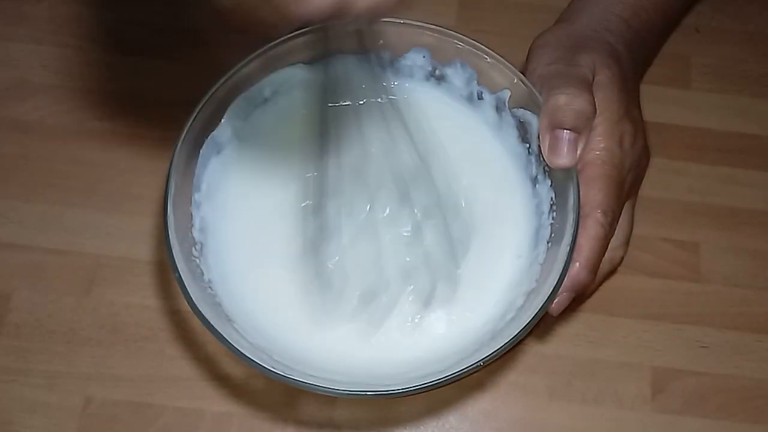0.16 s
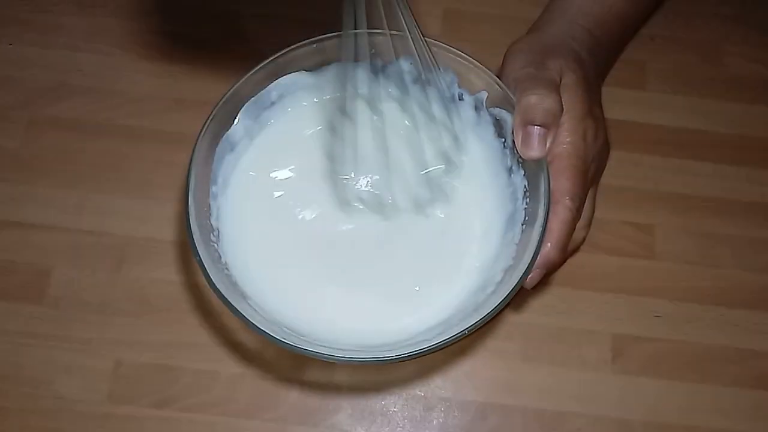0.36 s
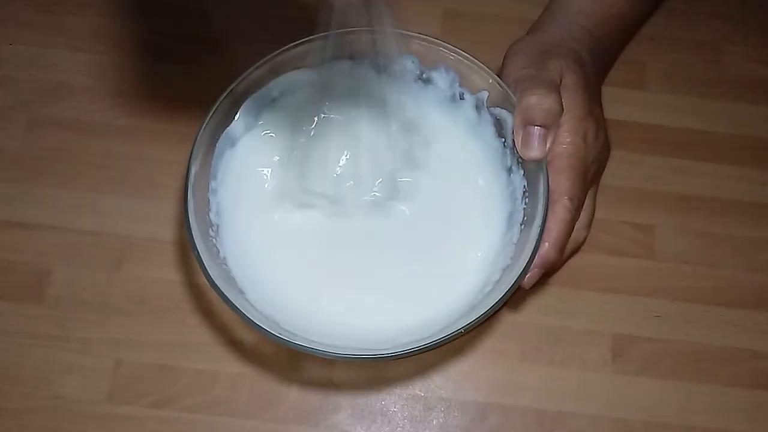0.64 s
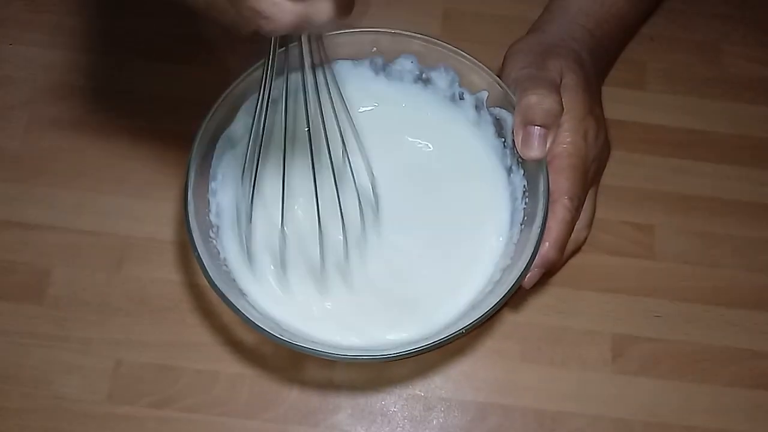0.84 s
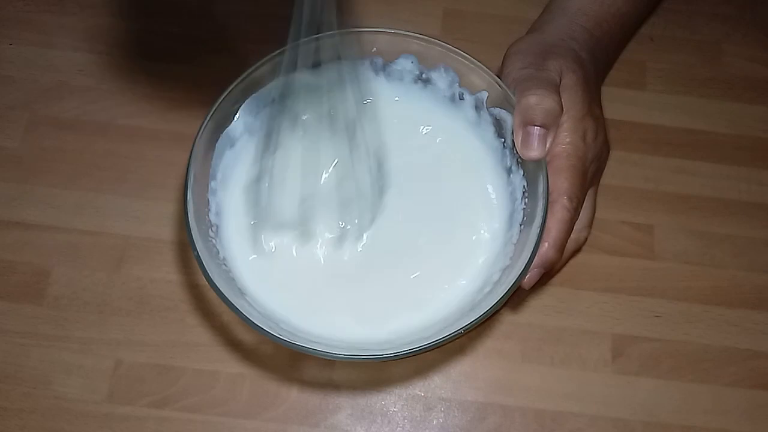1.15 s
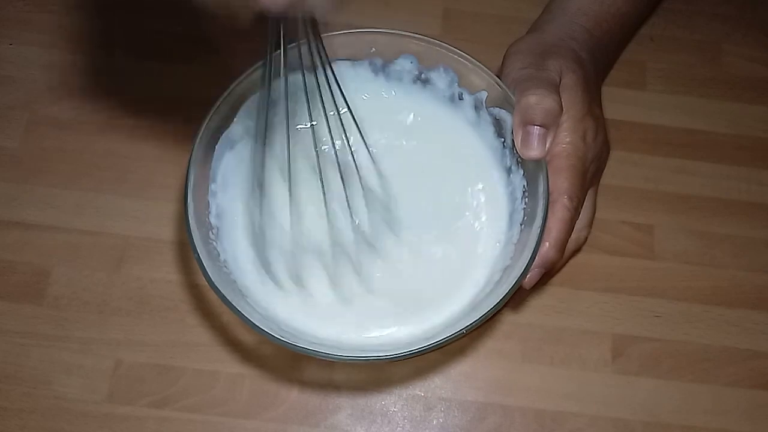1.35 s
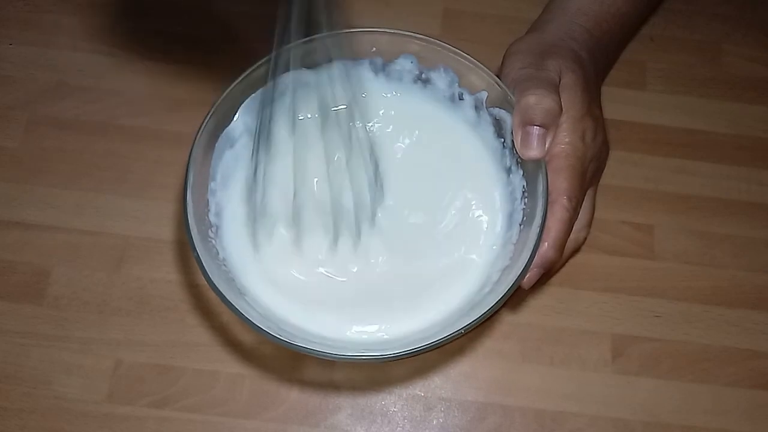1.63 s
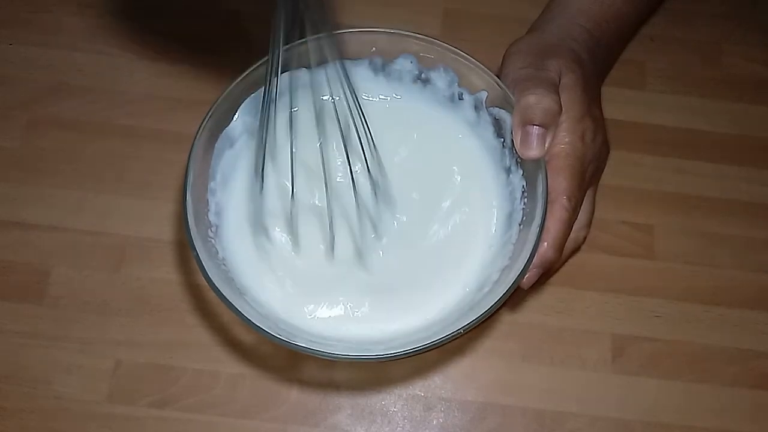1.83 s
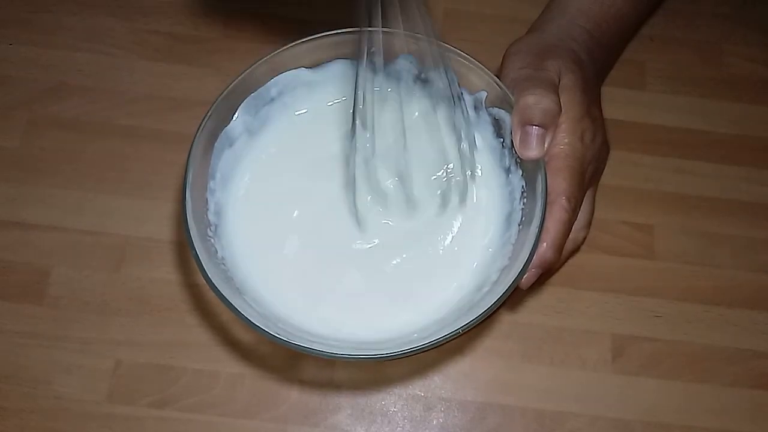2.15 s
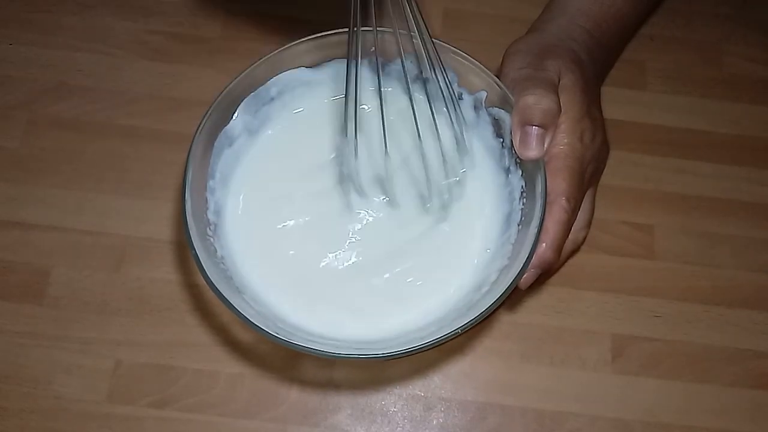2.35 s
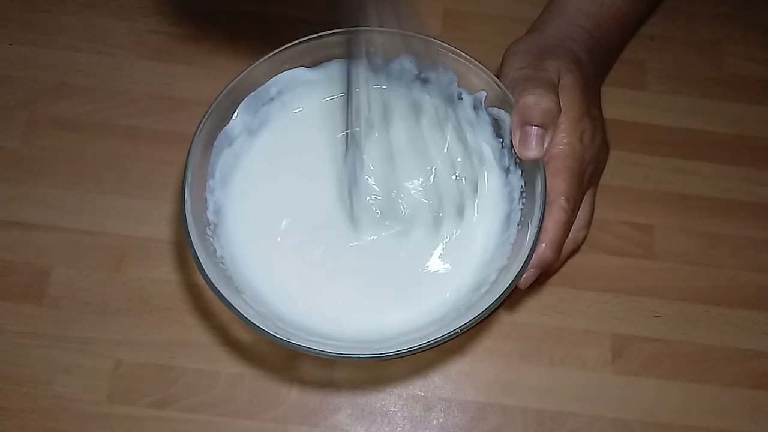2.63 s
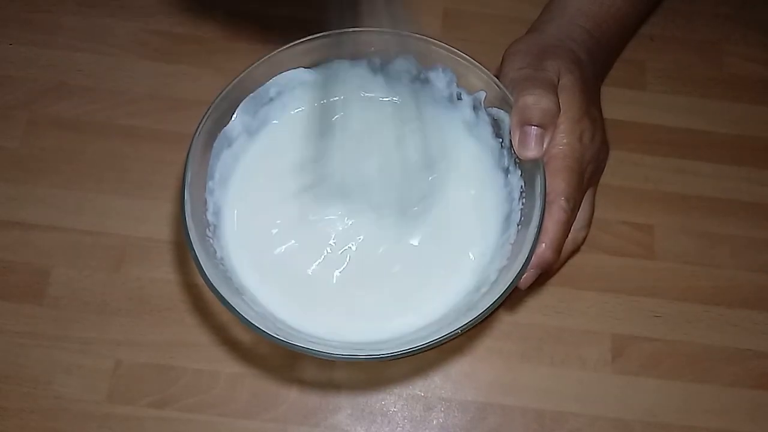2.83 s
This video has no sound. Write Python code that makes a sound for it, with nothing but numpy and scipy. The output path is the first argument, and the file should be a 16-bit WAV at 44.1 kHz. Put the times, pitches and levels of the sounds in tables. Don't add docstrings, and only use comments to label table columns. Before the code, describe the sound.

Rapid whisking in a glass bowl: bright wire ticks, wet scraping hiss and dull counter knocks

```python
import sys
import numpy as np
from scipy import signal
from scipy.fft import rfft, irfft
from scipy.io import wavfile
from scipy.ndimage import uniform_filter1d

SR = 44100
rng = np.random.default_rng(int(sys.argv[2]) if len(sys.argv) > 2 else 0)


def boost_factor(decibels):
    exponent = np.asarray(decibels, float) / 20
    return 10 ** exponent


def generate_wav(sig):
    pcm = np.round(np.clip(np.atleast_2d(sig).T, -1, 1) * 32767).astype(np.int16)
    wavfile.write(sys.argv[1], SR, pcm)


N = 132300

# (time [s], level [dB])
DRAG_LEVEL = [(0, -64.5), (.07, -104), (.19, -112.5), (0.211, -57.5), (.4, -62), (.5, -71), (.55, -53.5),
              (0.802, -66), (1.0, -60), (1.11, -72), (1.3, -59), (1.9, -55), (2.3, -58.5), (2.5, -65.5),
              (2.599, -58.5), (2.9, -61.5), (3, -71)]
# (time [s], level [dB], deep boom [dB re level], hard clatter [dB re the counter's ring])
KNOCKS = [(0.003, -39.5, -3.5, 3.5), (0.233, -30, 1, -4.5), (0.2564, -23.5, 0, 6.5),
          (0.294, -35, -18, -2.5), (0.34, -35, -19, -2.5), (0.5301, -22, -20, 2), (0.587, -30, -12, 2),
          (0.633, -33.5, -21, 0), (0.67, -33, 2, -2.5), (0.8398, -21.5, -5.5, 5), (0.8605, -21, -9, 2.5),
          (0.898, -61, 0, 4), (0.96, -28.5, -3, -3.5), (0.999, -48, -36, -4), (1.125, -25.5, -8, -4.5),
          (1.1354, -25, -1, -5), (1.206, -28, -7, -10.5), (1.37, -29, -6, -2), (1.42, -32.5, 6, -2),
          (1.467, -28, -4, 0.5), (1.526, -48.5, -13, 7), (1.639, -41, -26, 4.5), (1.738, -38.5, 2, 1.5),
          (1.896, -34, 7, 1), (2.107, -36, -6, -7), (2.2391, -29.5, -18, 9), (2.259, -37, -14, 0),
          (2.28, -34.5, 0, -2.5), (2.338, -34.5, 4, -2), (2.568, -47, 14, 2), (2.737, -38.5, 0, 2.5),
          (2.757, -37.5, -12, -2.5), (2.797, -40, 6, 0), (2.971, -43, -17, 19)]
# (time [s], level [dB], dull bowl ring [dB re level], first slap [dB re the flurry after it], pitch of the
# loudest wire [Hz])
WIRE_TICKS = [(0.0296, -49.5, -11, 17, 6500), (0.103, -45.5, -9, 4, 6700), (0.196, -51, -8, 1, 2350),
              (0.2137, -44, -23, 17, 6800), (0.231, -29, -17, 15, 5470), (0.2498, -27.5, -9, 20, 5800),
              (0.288, -31.5, -26, 1, 6500), (0.329, -20.5, -12, 7, 4800), (0.365, -19, -15, -15, 6960),
              (0.5189, -24.5, -12, 15, 6630), (0.529, -27, -15.5, 14, 6600), (0.5784, -20.5, -33, 5, 6630),
              (0.61, -28.5, -35, 1, 5850), (0.6609, -22.5, -23, 4, 6320), (0.6818, -22, -14, 9, 6780),
              (0.8288, -27, -10, 10, 7000), (0.8388, -24.5, 0, 1, 6180), (0.8835, -28.5, -27, 28, 6510),
              (0.9568, -19.5, -15, 4, 6790), (0.9929, -27, -7.5, -6, 6600), (1.0646, -37.5, -5.5, -1, 7100),
              (1.1217, -31.5, -9, 11, 3440), (1.1351, -23.5, -14, 21, 6620), (1.1763, -33, -25, 3, 5860),
              (1.2016, -27, -15, 2, 6610), (1.2372, -35, -17, 6, 7200), (1.2521, -25.5, -9, 16, 6480),
              (1.3032, -31, -13.5, -12, 4380), (1.3663, -35, -16, 7, 6860), (1.392, -33.5, -9.5, 11, 2920),
              (1.4149, -25.5, -32, 1, 6580), (1.4632, -21, -22, -5, 6780), (1.511, -22.5, -16, -11, 6870),
               (1.574, -34.5, -31, 0, 5950), (1.6139, -34, -31, -7, 5460), (1.6555, -24, -13, 6, 6950),
               (1.7202, -31.5, -13.5, 25, 7100), (1.7339, -21, -15.5, -15, 6990),
               (1.8411, -30.5, -10, 6, 4160), (1.8742, -29.5, -31, 14, 4540),
               (1.884, -23.5, -13.5, -8, 5670), (1.924, -34.5, -35, -5, 6500),
               (1.9655, -31, -6.5, 13, 6840), (2.035, -34.5, -12, 23, 2700), (2.104, -25, -14, -26, 5950),
               (2.225, -26.5, -17, -16, 6430), (2.2309, -23, -11, -7, 2550), (2.334, -29, -11.5, -13, 4240),
               (2.3891, -42.5, -3.5, 8, 6380), (2.5213, -34, -23, -2, 6290), (2.5452, -29.5, -20, -5, 6630),
               (2.558, -26.5, -13.5, -23, 5800), (2.609, -40.5, -16, 11, 6500),
               (2.679, -36.5, -21, 4, 6550), (2.6961, -29.5, -12, 8, 6600),
               (2.733, -29.5, -12.5, -4.5, 6600), (2.8042, -34, -17, 1, 3910),
               (2.8817, -40, -6.5, -4, 6290), (2.9528, -38.5, -24, -2, 6580), (2.9686, -31, -12, 9, 6700),
              (0.2568, -27, -10.5, 4, 3980), (0.456, -46, -20, 10, 6630), (0.563, -35, -32, 8, 4100),
               (0.625, -39, -10, 20, 6560), (0.652, -30, -26, -12, 6540), (0.668, -28.5, -2, 4, 2670),
               (0.689, -32, -7, 9, 5160), (0.78, -45, -12, -3, 5260), (0.968, -26, -12, 6, 5960),
               (1.032, -44, -19, 6, 7300), (1.209, -29.5, -5.5, 6, 6060), (1.9713, -27.5, -8, 18, 5170),
               (2.063, -66, -18, 12, 6200), (2.158, -35.5, -8, -1, 6700), (2.215, -33.5, -21, 5, 2700),
               (2.304, -41, -20, -8, 6300), (2.426, -51, -12, -5, 6200), (2.4726, -55.5, 2.5, -4, 6610),
               (2.5111, -50, -12, 0, 6580), (2.9356, -46, -11, 0, 5100)]
# (frequency [Hz], width [Hz], level [dB])
WIRE_RESONANCES = [(2580, 92, -4), (2970, 58, -12), (3570, 190, 2), (4300, 48, -16.5), (4370, 350, 7.5),
                   (4940, 200, 2), (5800, 150, -26), (6600, 190, 8.5), (7170, 89, -1), (9370, 720, 1.5),
                   (10750, 86, -8), (15000, 450, -21)]
# (frequency [Hz], level [dB], t60 [s])
BOWL_MODES = [(496, -3.5, 0.01), (586.3, -1.5, 0.1), (671.7, -3.5, 0.087), (816, -13, 0.05),
              (1032, -20, 0.05), (1093, -9.5, 0.033), (1142, -4.5, 0.063), (1304, -10, 0.024),
              (1406, -11.5, 0.045), (1596, -9, 0.0043), (1985, -1, 0.013)]
# (frequency [Hz], level [dB], t60 [s])
COUNTER_MODES = [(196, -17, 0.099), (204.3, 11, 0.15), (229.1, 20.5, 0.14), (254, 4.5, 0.12),
                 (336.3, -4, 0.24)]
# (frequency [Hz], level [dB], t60 [s])
BOOM_MODES = [(92.6, -0.5, 0.19), (113.2, -13, 0.83)]
# (frequency [Hz], level [dB], t60 [s])
FOOT_MODES = [(306, 3, 0.044), (1030, -9.5, 0.027), (1435, 4.5, 0.024)]
# (frequency [Hz], level [dB per Hz])
CRACK_COLOUR = [(880, -0.5), (1500, -0.5), (2820, -5), (6760, 0), (8860, -18.5), (9690, -8), (12800, -41),
                (15100, -13.5), (17000, -16)]
# (low edge [Hz], high edge [Hz])
THUD_BAND = [222, 1700]
# (frequency [Hz], width [Hz], depth [0-1])
PLACE_DIPS = [(150, 40.6, 0.8), (431.6, 128, 0.71)]

KNOCK_SAMPLES, TICK_SAMPLES = 12000, 6000
STILL = np.zeros((2, 14))


def unit(x):
    return x / np.sqrt(np.mean(x ** 2) + 1e-18)


def energy(x):
    return x / np.sqrt(np.sum(x ** 2) + 1e-18)


def decay(t, t60):
    return np.exp(-np.log(1000) * t / t60)


def colour(x, points):
    hz, db = np.array(points, float).T
    f = np.maximum(np.arange(len(x) // 2 + 1) * SR / len(x), 1)
    return irfft(rfft(x) * boost_factor(np.interp(np.log(f), np.log(hz), db, left=-60)), len(x))


def ring(modes, scatter_db, chance, size=KNOCK_SAMPLES, sag=0.):
    hz, db, t60 = np.array(modes, float).T
    t = np.arange(size) / SR
    hz = hz * (1 + 0.014 * chance[1, :len(hz)])
    gain = boost_factor(db + scatter_db * chance[0, :len(hz)])
    bend = 1 - sag * (1 + chance[1, -1]) * t
    partials = decay(t, np.maximum(t60, .004)[:, None]) * np.sin(2 * np.pi * hz[:, None] * t * bend)
    return energy(gain @ partials)


def wire_modes():
    return [(hz, db, 1.46 / width) for hz, width, db in WIRE_RESONANCES]


def add(out, x, s):
    i = max(int(s * SR), 0)
    out[i:i + len(x)] += x[:N - i]


def walk(rate):
    k = int(SR / rate)
    return 1.3 * uniform_filter1d(np.repeat(rng.standard_normal(N // k + 1), k), k)[:N]


def drag():
    clicks_per_s, scatter_db, flicker_db = 3000, 0.5, 5
    froth_db, level_db = -15, 1
    strays_per_s, stray_db, stray_s = 70, -3.5, 0.0015
    luck = rng.random((3, N))
    size = boost_factor(-scatter_db * np.log(luck[1])) * np.sign(luck[2] - .5)
    grit = (luck[0] < clicks_per_s / SR) * size

    def through(modes):
        heard = signal.fftconvolve(grit, ring(modes, 0, STILL))[:N]
        return unit(heard) * boost_factor(flicker_db * walk(26.91))

    hiss = unit(colour(grit, CRACK_COLOUR)) + boost_factor(froth_db) * unit(np.gradient(grit))
    sound = hiss * boost_factor(flicker_db * walk(35.0))
    for modes, db in [(wire_modes(), -6), (BOWL_MODES, -0.5), (COUNTER_MODES, 0), (BOOM_MODES, 0)]:
        sound = sound + boost_factor(db) * through(modes)

    strays = (luck[2] < strays_per_s / SR) * luck[1]
    flick = signal.lfilter([1], [1, -np.exp(-1 / (stray_s * SR))], strays) * rng.standard_normal(N)
    sound = sound + boost_factor(stray_db) * unit(colour(flick, CRACK_COLOUR))
    s, db = np.array(DRAG_LEVEL).T
    return sound * boost_factor(np.interp(np.arange(N) / SR, s, db) + level_db)


def knocks():
    knock_trim_db, boom_trim_db = 4.5, -5.5
    push_s, harden, rock_s, swell_s = 0.001, 0.41, 0.0073, 0.0093
    bowl_db, thud_db, thud_s, foot_db = -4, -5, 0.017, -5.5
    out, t = np.zeros(N), np.arange(KNOCK_SAMPLES) / SR
    thud_filter = signal.butter(2, THUD_BAND, "band", fs=SR, output="sos")
    for s, db, boom_db, clatter_db in KNOCKS:
        chance, luck = rng.standard_normal((3, 2, 14)), rng.standard_normal(len(t))
        push = np.hanning(max(int(push_s * SR * boost_factor(-harden * clatter_db)), 3))
        chatter = np.convolve(push, (t == 0) + 0.053 * luck * np.exp(-t / rock_s))

        thud = energy(signal.sosfilt(thud_filter, luck) * np.exp(-t / thud_s))
        body = ring(COUNTER_MODES, 3.9, chance[0], sag=0.59)
        body = body + boost_factor(bowl_db + clatter_db) * ring(BOWL_MODES, 1.0, chance[2])
        body = body + boost_factor(thud_db + clatter_db) * thud
        body = body + boost_factor(foot_db + clatter_db) * ring(FOOT_MODES, 1.5, chance[1, :, ::-1])
        boom = ring(BOOM_MODES, 1.9, chance[1]) * (1 - np.exp(-t / swell_s))
        add(out, 10 * boost_factor(db + knock_trim_db) * energy(signal.fftconvolve(chatter, body)), s)
        add(out, 10 * boost_factor(db + boom_db + boom_trim_db) * energy(boom), s)
    return out


def ticks():
    landings, landings_per_s, landing_scatter_db, mode_scatter_db = 250, 7000, 2.5, 4.5
    flurry_s, slap_s, first_wire = 0.0061, 0.0022, 1.38
    ring_db, crack_db, crack_t60_s, snap_db, snap_s = -4, 1.5, 0.016, 4.5, 0.00032
    loud_wire_db, loud_wire_t60_s = -4.5, 0.011
    tick_trim_db, bowl_trim_db = -4.5, 6
    out, t = np.zeros(N), np.arange(TICK_SAMPLES) / SR
    crack_fall = decay(t, crack_t60_s) + boost_factor(snap_db) * np.exp(-t / snap_s)
    for s, db, bowl_db, slap_db, hz in WIRE_TICKS:
        chance, luck = rng.standard_normal((2, 2, 14)), rng.standard_normal((3, landings))
        noise = rng.standard_normal(len(t))
        when = np.cumsum(luck[0] ** 2) / landings_per_s * (np.arange(landings) > 0)
        x = when / flurry_s
        swell = x * np.exp(-x * x / 2) + boost_factor(slap_db) * np.exp(-when / slap_s)
        size = boost_factor(landing_scatter_db * luck[1]) * swell * np.sign(luck[2])
        size[0] = first_wire * boost_factor(slap_db)
        land = energy(np.bincount((when * SR).astype(int), size))

        crack = energy(colour(noise, CRACK_COLOUR) * crack_fall)
        bright = boost_factor(ring_db) * ring(wire_modes(), mode_scatter_db, chance[0], size=len(t))
        bright = bright + boost_factor(crack_db) * crack
        loud_wire = ring([(hz, 0, loud_wire_t60_s)], 0, STILL, size=len(t))
        bright = bright + boost_factor(loud_wire_db) * loud_wire
        bowl = ring(BOWL_MODES, mode_scatter_db, chance[1], size=len(t), sag=0.18)
        dull = signal.fftconvolve(land, bowl)
        add(out, 10 * boost_factor(db + tick_trim_db) * energy(signal.fftconvolve(land, bright)), s)
        add(out, 10 * boost_factor(db + bowl_db + bowl_trim_db) * energy(dull), s)
    return out


def kitchen(x):
    level_db, low_t60_s, treble_t60_s, split_hz, delay_s = -6.5, 0.28, 0.23, 2300, 0.0022
    t, noise = np.arange(SR // 2) / SR, rng.standard_normal(SR // 2)
    low = signal.sosfilt(signal.butter(2, split_hz, fs=SR, output="sos"), noise)
    tail = low * decay(t, low_t60_s) + (noise - low) * decay(t, treble_t60_s)
    tail = energy(tail * np.clip(t / delay_s, 0, 1))
    return boost_factor(level_db) * signal.fftconvolve(x, tail)[:N]


def scene():
    hits = ticks() + knocks()
    room = kitchen(hits)
    rubbing = drag()
    hiss = boost_factor(-86) * rng.standard_normal(N)
    return (hits + room + rubbing + hiss)[None]


def roll_off(x):
    return signal.sosfilt(signal.butter(12, 16990, fs=SR, output="sos"), x)


def record(dry):
    gate_db, gate_s, gate_steep = -69, 0.003, 1.9
    for hz, width, depth in PLACE_DIPS:
        dry = dry - depth * signal.lfilter(*signal.iirpeak(hz, hz / width, fs=SR), dry)
    dry = signal.sosfilt(signal.butter(2, 84, "high", fs=SR, output="sos"), dry)
    loud = np.sqrt(uniform_filter1d(dry ** 2, int(gate_s * SR), axis=1) + 1e-18)
    dry = dry * np.minimum(loud / boost_factor(gate_db), 1) ** gate_steep
    finished = signal.sosfilt(signal.ellip(8, .2, 31, 15750, fs=SR, output="sos"), dry)
    return roll_off(finished)


dry = scene()
out = record(dry)
generate_wav(out)
```